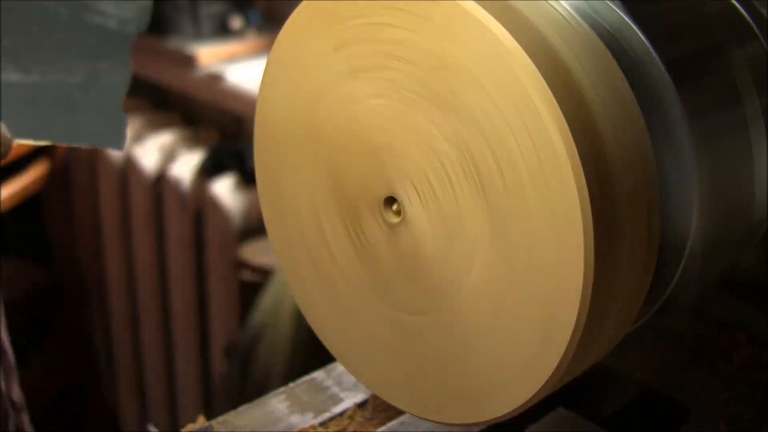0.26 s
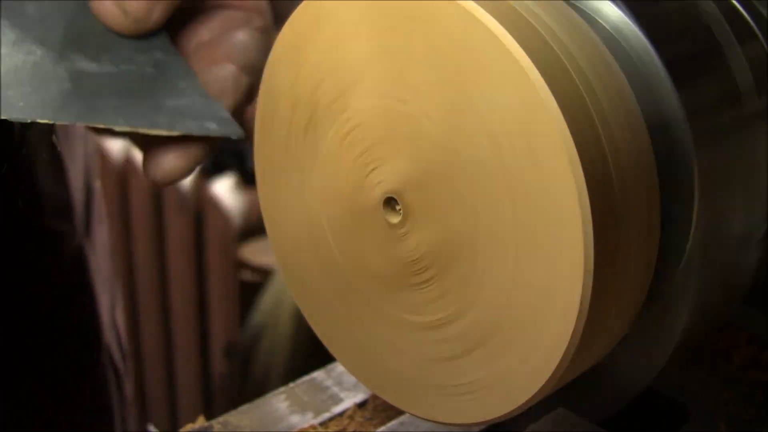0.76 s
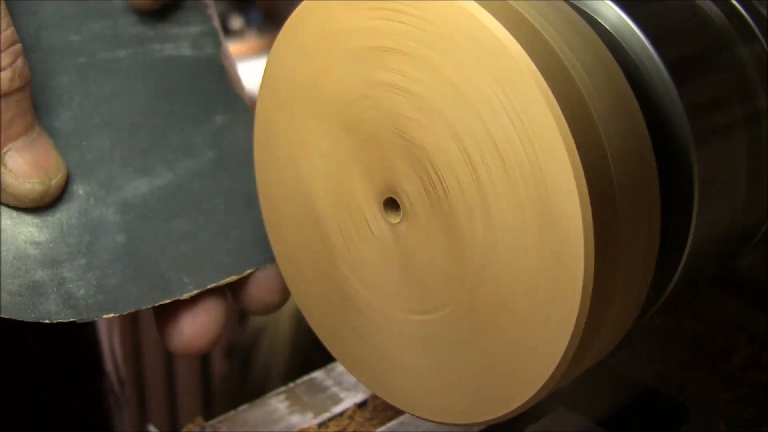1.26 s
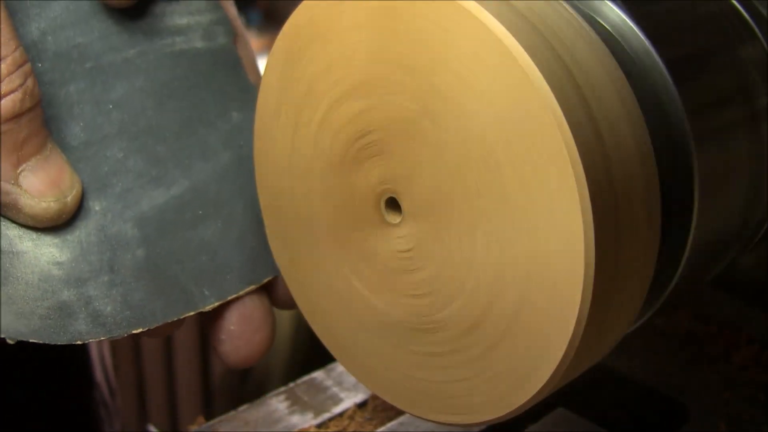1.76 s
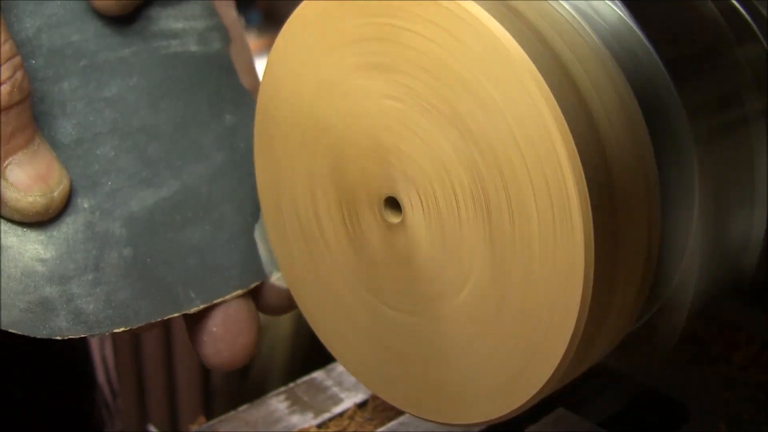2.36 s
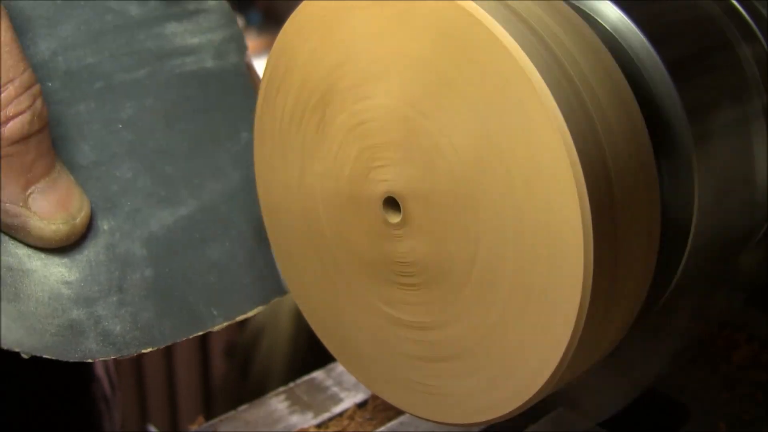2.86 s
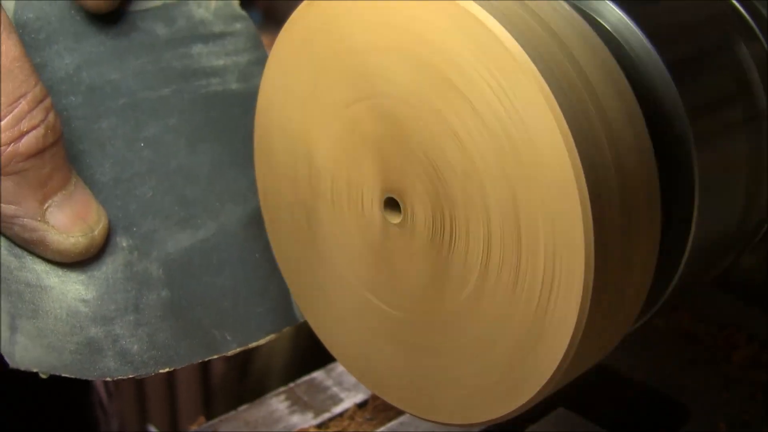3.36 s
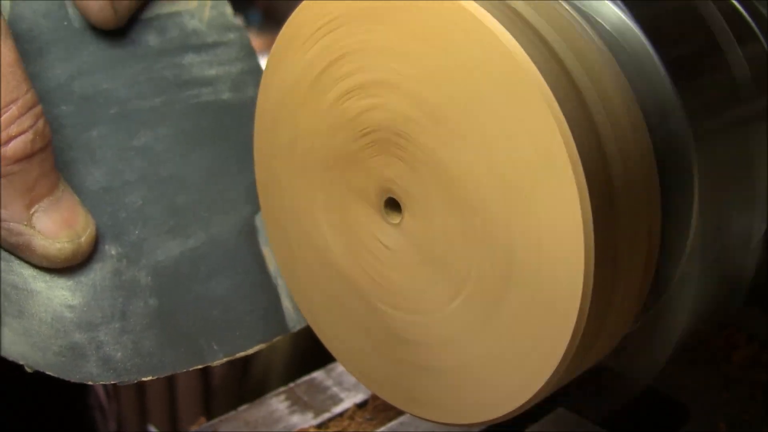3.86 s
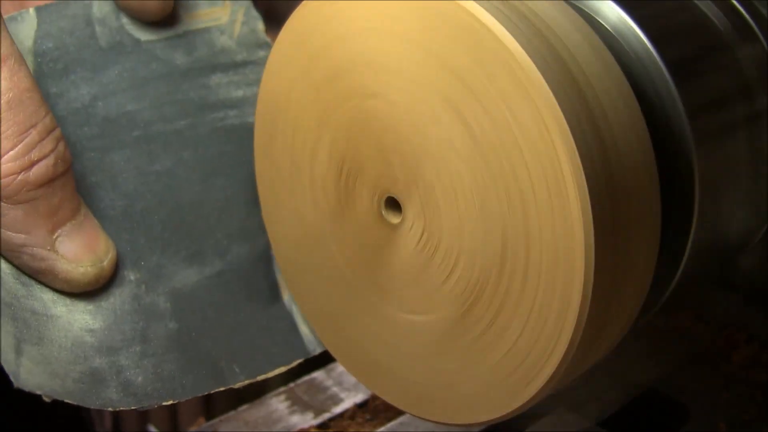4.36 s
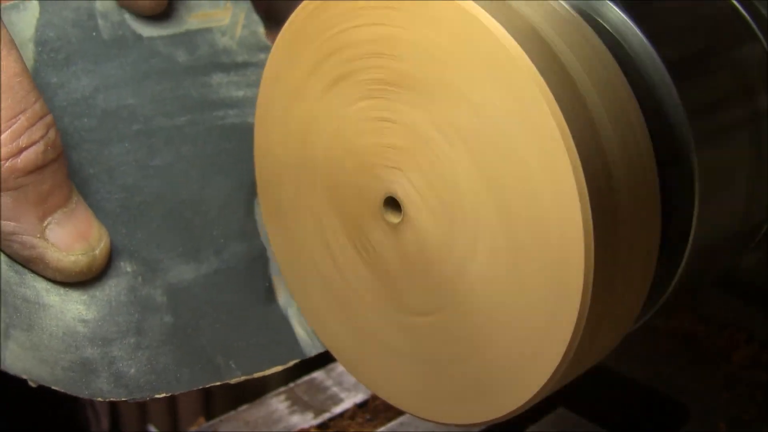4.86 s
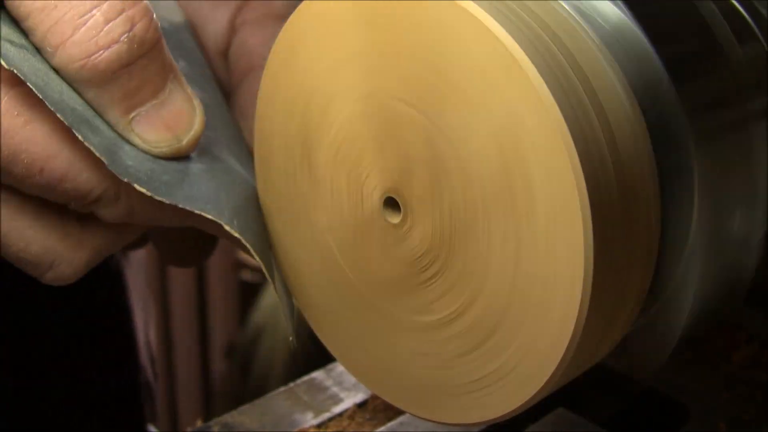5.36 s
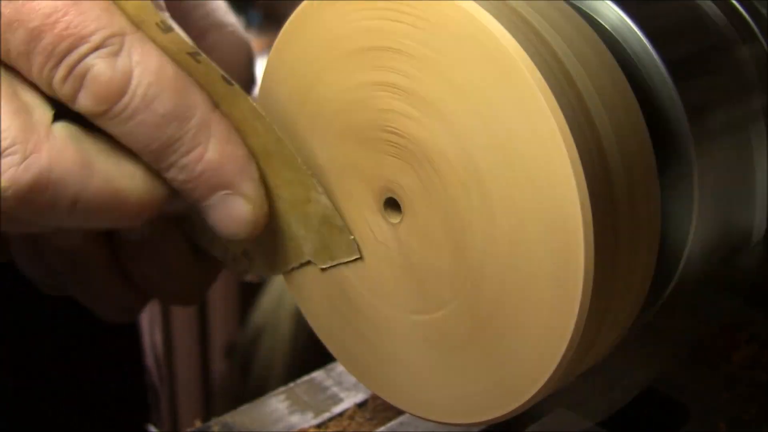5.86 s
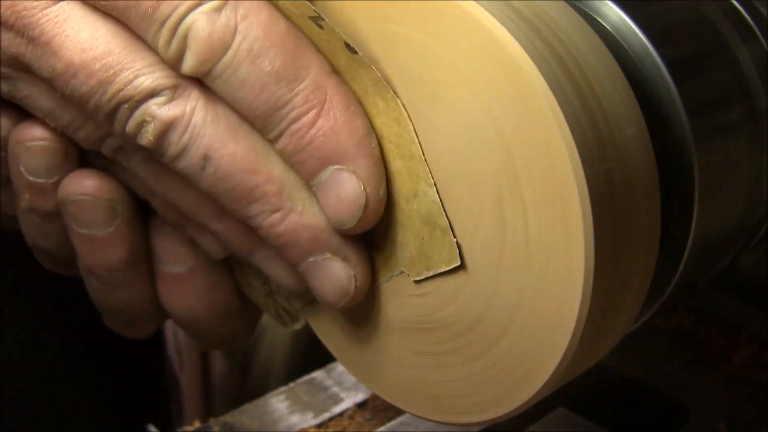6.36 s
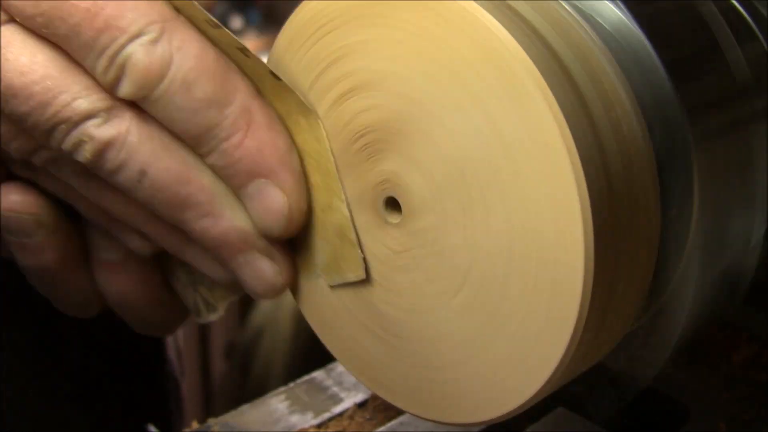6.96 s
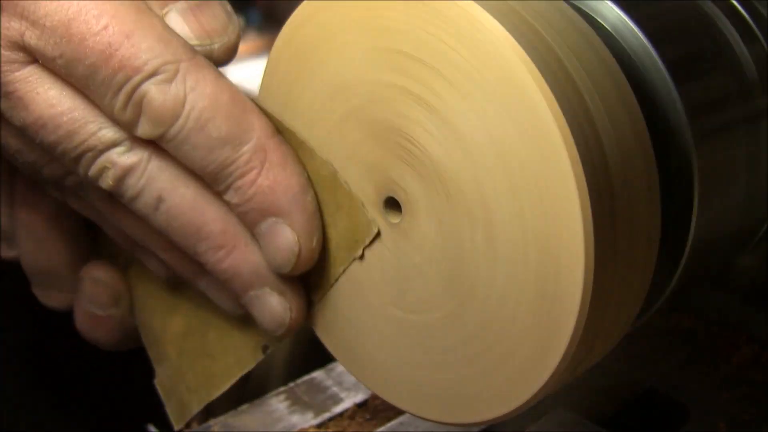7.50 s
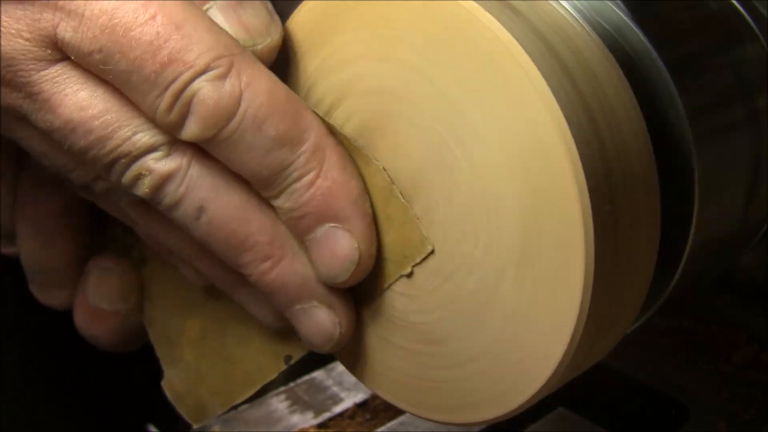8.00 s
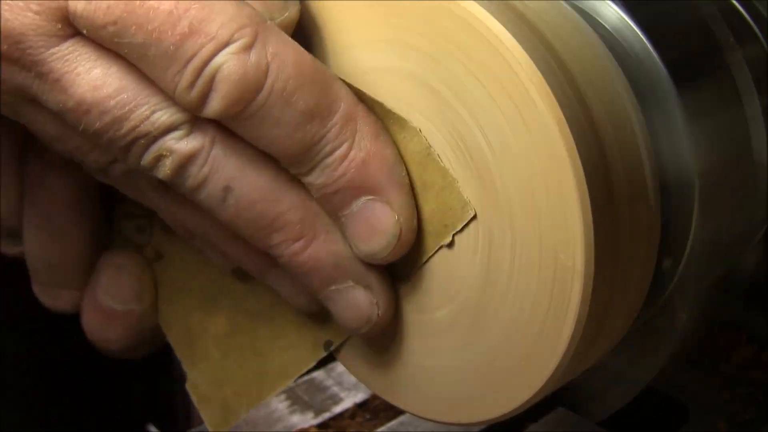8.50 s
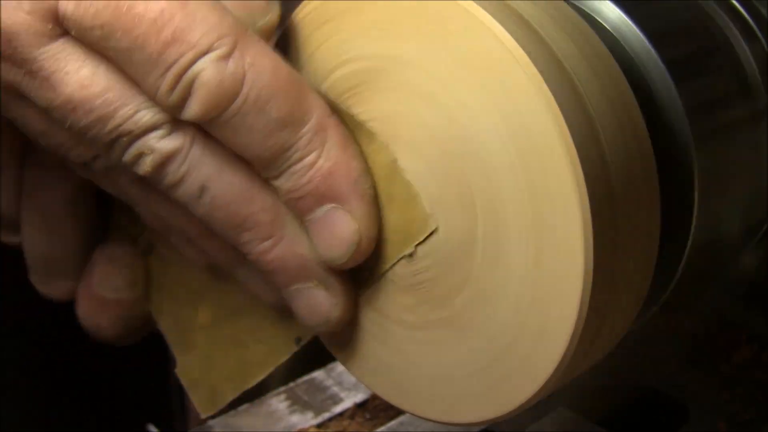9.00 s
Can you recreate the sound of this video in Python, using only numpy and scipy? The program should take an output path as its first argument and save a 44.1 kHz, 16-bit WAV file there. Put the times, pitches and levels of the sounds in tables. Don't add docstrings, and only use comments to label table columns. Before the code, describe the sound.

Steady electric motor whine around one kilohertz with bearing rattle, and bursts of bright sandpaper hiss, dry ticking snaps and thin squeaks on turning wood.

```python
import sys
import numpy as np
from scipy import signal
from scipy.fft import rfft, irfft, next_fast_len
from scipy.io import wavfile
from scipy.ndimage import uniform_filter1d

SR = 44100
rng = np.random.default_rng(int(sys.argv[2]) if len(sys.argv) > 2 else 0)


def gain_from_db(level_db):
    decades = np.asarray(level_db, float) / 20
    return 10 ** decades


def transcribe(signal):
    frames = np.atleast_2d(signal).T
    limited = np.clip(frames, -1, 1)
    pcm = np.round(limited * 32767).astype(np.int16)
    wavfile.write(sys.argv[1], SR, pcm)


N = 407484
T = np.arange(N) / SR
SLOTS = 44
SPINDLE_HZ = 30.4


def evened(x):
    return x / np.sqrt(np.mean(x ** 2) + 1e-20)


def read(points, hz):
    f, value = np.transpose(points)
    return np.interp(np.log(hz + 1), np.log(f + 1), value)


def coloured(x, points, modes=()):
    hz = abs(np.fft.fftfreq(16384, 1 / SR))
    db = read(points, hz)
    for mode_hz, width_hz, lift_db in modes:
        db = db + lift_db / (1 + (2 * (hz - mode_hz) / width_hz) ** 2)
    log_gain = np.log(gain_from_db(np.maximum(db, -100)))
    minimum_phase = np.exp(np.conj(signal.hilbert(log_gain)))
    taps = np.fft.ifft(minimum_phase).real[:4096]
    return signal.oaconvolve(x, taps)[:len(x)]


def drift(hz):
    coarse_t = T[::64]
    b, a = signal.butter(2, 128 * hz / SR)
    slow = signal.lfilter(b, a, rng.standard_normal(len(coarse_t)))
    return evened(np.interp(T, coarse_t, slow))


def resonate(x, hz, width):
    turn = np.exp(2j * np.pi * np.cumsum(hz) / SR)
    r = np.exp(-np.pi * width / SR)
    return 2 * (turn * signal.lfilter([1 - r], [1, -r], x / turn)).real


def grit(per_s, spread_db):
    size_db = spread_db * np.minimum(rng.exponential(1, N), 3.5)
    size = gain_from_db(size_db) * rng.choice([-1., 1.], N)
    return evened(size * (rng.random(N) < per_s / SR))


def patchy(x, patchy_db, size=(8, 30)):
    z = signal.stft(x, nperseg=512)[2]
    patches = uniform_filter1d(rng.standard_normal(z.shape), size=size[0], axis=0)
    patches = uniform_filter1d(patches, size=size[1], axis=1)
    return signal.istft(z * gain_from_db(patchy_db * evened(patches)), nperseg=512)[1][:N]


def span(rows):
    s, *columns = np.transpose(rows)
    touch_s = 0.0086
    gate = np.clip(np.minimum(T - s[0], s[-1] - T) / touch_s, 0, 1)
    return gate, [np.interp(T, s, c) for c in columns]


SLOT_SIDES_DB = [-15, -12.7, -1.3, -7.5, -24.5]
# multiple of rotor speed [ratio], then its level in [dB].
POLE_ORDERS = [32, 36.99, 37.93, 38.95, 40, 42, 46, 48, 50.05, 54.05, 56.03, 58.04, 62.1]
POLE_DB = [-38, -26, -27.5, -26.5, -16.5, -31, -26, -9.5, -25, -20, -49, -24.5, -33.5]
# multiple of rotor speed [ratio], then its level in [dB].
BEAT_ORDERS = [12.045, 14.47, 17.52, 22.2, 23.18, 26.74, 29.04, 30.8, 34.8, 41.09, 42.85, 45.14, 46.83,
               47.14, 49.13, 50.89, 51.33, 53.13, 55.11, 57.18]
BEAT_DB = [-35, -49, -42.5, -27, -35.5, -31, -46, -32.5, -52, -21.5, -30, -27, -15, -28, -10, -23.5, -47,
           -17.5, -73, -24.5]
# frequency in [Hz], level in [dB].
HUM = [(200.11, -38.5), (400.2, -43)]
# frequency in [Hz], density in [dB per Hz].
DRONE = [(30, -42), (130, -45), (220, -32), (330, -28), (480, -24.5), (610, -23), (820, -18.5),
         (1050, -12.5), (1120, 1.5), (1270, 0.5), (1390, -10), (1600, -18), (1850, -21), (2300, -24.5),
         (2800, -51.5)]
# frequency in [Hz], width in [Hz], lift in [dB].
CASING = [(295, 30, 8), (360, 20, 6), (550, 35, 14), (690, 40, 11), (890, 50, 7), (995, 30, 9),
          (1697, 22, 12), (1770, 25, 5), (1985, 40, 6), (2118, 50, 7), (2262, 40, 6)]
TWINS = {3: (.3, -.6), 40: (.7, 1.7), 48: (.22, 2.1), 49.13: (.25, 2.2), 57.18: (.9, 0), 45.14: (.3, 2.1)}
# moment when the slip beat cancels, in [s].
NULLS_S = [-.45, .3, 1.1, 1.75, 2.33, 2.95, 3.49, 4.06, 4.68, 5.33, 5.97, 6.6, 7.27, 7.87, 8.5, 9.16, 9.8]
# time in [s], share covered [0-1].
SHADE = [(0, .6), (.33, 1), (.55, .6), (.8, 0)]
SHADED = {3: (-6, 0), 40: (-5, -6), 48: (-3, -3), 49.13: (-6, -6), 53.13: (6, 0), 2: (-1.5, 0)}


def whine(rotor):
    swing = 2 * np.pi * 200.1 * T
    slip = 2 * np.pi * (np.interp(T, NULLS_S, np.arange(len(NULLS_S))) + .5)
    shade = np.interp(T, *np.transpose(SHADE))

    def tone(name, db, angle, wobble_db):
        twin, lag = TWINS.get(name, (0, 0))
        line_db, twin_db = SHADED.get(name, (0, 0))
        line = np.cos(angle) * (gain_from_db(line_db * shade) if line_db else 1)
        if twin:
            line = line + twin * gain_from_db(twin_db * shade) * np.cos(angle - slip + lag)
        return gain_from_db(db + 3.5 + wobble_db * drift(7.9)) * line

    def band(lo_hz, hi_hz):
        sos = signal.butter(3, [lo_hz, hi_hz], "bandpass", fs=SR, output="sos")
        return signal.sosfiltfilt(sos, out)

    out = np.zeros(N)
    for k, db in enumerate(SLOT_SIDES_DB):
        side_lag = .8 * (k != 2)
        out += tone(k, db, SLOTS * rotor + (k - 2) * swing - side_lag, .4)
    for order, db in zip(POLE_ORDERS, POLE_DB):
        out += tone(order, db, order * rotor, .9)
    for order, db in zip(BEAT_ORDERS, BEAT_DB):
        out += tone(order, db, order * rotor + 2 * np.pi * rng.random(), 0.58)
    for hz, db in HUM:
        out += tone(hz, db, 2 * np.pi * hz * T, .2)
    out += gain_from_db(-7.0) * evened(coloured(rng.standard_normal(N), DRONE, CASING))
    mirrored = 1.2 * np.clip(1 - T / .33, 0, 1) * band(1337, 1510)
    screened = .15 * shade * band(900, 1290)
    return out + mirrored - screened


# frequency in [Hz], density in [dB per Hz].
RATTLE = [(300, -69), (1500, -31.5), (1900, -16.5), (2300, -8.5), (2700, -4.5), (3600, 0.5), (4250, -1),
          (4740, -8.5), (5300, -7.5), (5900, -12.5), (7000, -18.5), (9900, -20.5), (12500, -28.5),
          (16000, -35)]
# frequency in [Hz], width in [Hz], lift in [dB].
HEADSTOCK = [(2190, 25, 4), (2390, 35, 7), (2537, 40, 8), (2590, 20, 4), (2800, 50, 4), (2965, 35, 8),
             (3045, 40, 6), (3107, 40, 9), (3160, 40, -4), (3250, 35, 7), (3405, 40, 5), (3530, 60, 5),
             (3760, 60, -4), (3833, 35, 6), (4200, 100, 2), (4390, 40, 3), (4650, 50, 6), (4880, 80, -4),
             (5095, 70, 8), (6220, 160, 9), (7400, 400, 3), (10100, 120, 7)]
# frequency in [Hz], density in [dB per Hz].
FINE = [(1000, -90), (9000, -46), (12000, -18), (13200, 6), (14300, 4), (15500, 7), (17000, -22)]


def bearings(spindle):
    balls = spindle * 141.35 / SPINDLE_HZ
    knocks = 1 + 0.087 * np.cos(balls / 2) + 0.13 * np.cos(balls) + 0.15 * np.cos(2 * balls + 0.36)
    throb_db = 0.4 * np.cos(spindle + .3) + 0.9 * np.cos(2 * spindle + .6)
    throb_db += 0.7 * drift(40) + 0.32 * drift(3.4)
    drive = (rng.standard_normal(N) + 0.59 * grit(2500, 2.2)) * knocks * gain_from_db(throb_db)
    loose_chips = gain_from_db(-41) * evened(coloured(grit(22, 3.5), FINE))
    air = rng.standard_normal(N) * gain_from_db(3.5 * drift(90))
    cooling_air = gain_from_db(-39) * evened(coloured(air, FINE))
    rattle = patchy(coloured(drive, RATTLE, HEADSTOCK), patchy_db=1.1, size=(2, 3))
    return gain_from_db(-6.0) * evened(rattle) + loose_chips + cooling_air


# time in [s], pressure as hiss in [dB],
# bend of the sheet [0 dull, 1 middle, 2 bright].
RIM_RUBS = [
    [(1.25, -43, 0.68), (1.3, -43, 0.6), (1.354, -36.5, 1.3), (1.436, -42.5, .6), (1.64, -36, 1.97),
     (2.05, -40.5, 2.1), (2.12, -43, 1.6), (2.2, -40, 2.3), (2.28, -44, 1.6), (2.37, -43, 1.8),
     (2.43, -49, 1.5), (2.54, -45, 1.9), (2.66, -54, 1.2), (2.78, -60, .6)],
    [(2.8, -53, .3), (2.886, -48.5, 1.9), (2.98, -39, 0.97), (3.1, -39.5, 1.16), (3.25, -41, 1.1),
     (3.52, -43, 1), (3.58, -40.5, 1.1), (3.68, -47, 1), (3.73, -43, 1.1), (3.8, -47.5, 1.1),
     (3.91, -41.5, .9), (3.99, -55, 0.64)],
    [(4.09, -47, .6), (4.116, -43, 1.3), (4.3, -46, 1.4), (4.37, -38.5, 1.5), (4.5, -43, 1.4),
     (4.6, -45.5, 1.5), (4.7, -43, 1.4), (4.77, -46, 1.5), (4.88, -42, 1.5), (4.95, -40.5, 1.3),
     (4.995, -53, 1.1)],
]
# time in [s], pressure as hiss in [dB], bend [0-2].
FACE_RUBS = [
    [(5.255, -42, .3), (5.31, -37, .9), (5.4, -41.5, 0.36), (5.75, -42, 0.18), (5.86, -34.5, 0.64),
     (5.93, -48, .6)],
    [(5.99, -46, 1.1), (6.044, -35.5, 1.5), (6.44, -33, 2.4), (6.6, -34.5, 1.6), (6.72, -33.5, 1.9),
     (6.76, -36.5, 1.6), (7.06, -35.5, 2), (7.09, -49, 1.1)],
    [(7.48, -60.5, .6), (7.52, -32, 1.6), (7.72, -41, 1.3), (7.95, -39.5, 1.4), (8.33, -40.5, 1.3),
     (8.62, -38.5, 1.6), (9.16, -38, 1.8), (9.25, -43, 1.2)],
]
CHATTER = [0.23, 0.16, 0.25, 0.29, 0.042, 0.028]
RINGS = [.5, .9, .1]
# frequency the loose sheet rings at on the rim, in [Hz], at bend 0, 1, 2.
RING_HZ = [8800, 10800, 14800]
# frequency in [Hz], density in [dB per Hz].
COARSE = [(300, -84), (1500, -38), (3000, -25), (5000, -3), (7000, -0.5), (8500, 1), (10000, -3),
          (11500, -29), (16000, -44)]
# frequency in [Hz], density in [dB per Hz].
MIDDLE = [(1000, -90), (6000, -19), (9000, -7), (10200, -4.5), (11500, -1), (12800, -4.5), (14000, -18),
          (16000, -40)]


def sanding(spindle):
    drive = rng.standard_normal((3, N)) + 0.61 * grit(5700, 2.3)
    grain_db = 0.82 * np.cos(2 * spindle + .4) + 0.34 * np.cos(6 * spindle + .4)
    drive *= gain_from_db(grain_db + 1.36 * drift(24) + 0.64 * drift(150))
    bump = evened(np.exp(1.7 * np.cos(3 * spindle + .7)) * gain_from_db(1.2 * drift(25)))
    gains, chatter, shape = np.zeros((3, N)), np.zeros(N), np.zeros(N)
    for rows, share in zip(RIM_RUBS + FACE_RUBS, CHATTER):
        gate, (db, bend) = span(rows)
        off_bend = np.arange(3)[:, None] - bend
        gains += gate * gain_from_db(db - 2 * off_bend ** 2)
        shape += (gate > 0) * bend
        chatter += gate * np.clip(share, 0, 1)
    drive *= 1 - chatter + chatter * bump
    hiss = np.zeros(N)
    for gain, x, grade in zip(gains, drive, (COARSE, MIDDLE, FINE)):
        hiss += gain * evened(coloured(x, grade))
    ringing = sum(ring * span(rows)[0] for ring, rows in zip(RINGS, RIM_RUBS))
    ring_hz = np.interp(shape, np.arange(3), RING_HZ)
    hiss = hiss + ringing * resonate(hiss, ring_hz, width=1700)
    return patchy(gain_from_db(-2.5) * hiss, patchy_db=2.1)


# start in [s], length in [s], pitch in [Hz], level in [dB], fall over its length in [dB].
WHISTLES = [
    (7.488, 2.5, 4180, -40, 20),
]
# start in [s], length in [s], first pitch in [Hz], last pitch in [Hz], level in [dB].
GRIPS = [(6.176, 0.22, 4080, 4330, -39.5), (6.388, .11, 4180, 4240, -38), (6.51, .15, 4170, 4270, -38),
         (6.672, .09, 4240, 4230, -37), (6.78, 0.13, 4110, 4320, -40), (6.903, 0.16, 4100, 4460, -43)]
# start in [s], length in [s], pitch in [Hz], level in [dB].
BITES = [(5.836, 0.066, 4230, -26.5), (6.055, 0.119, 4170, -32), (7.5, 0.075, 4080, -44.5),
         (7.85, 0.077, 4180, -41)]


def squeal():
    hz, low_gain, octave_gain = np.full(N, 4200.), np.zeros(N), np.zeros(N)
    whistle_low_db, bite_octave_db = -3.5, -10.5
    for start, length, pitch_hz, db, fall_db in WHISTLES:
        gate, (t,) = span([(start, 0), (start + length, length)])
        hz += (gate > 0) * (pitch_hz * (1 + .02 * np.exp(-t / .06)) - hz)
        gain = gate * gain_from_db(db - fall_db * np.sqrt(t / length))
        low_gain += gain_from_db(whistle_low_db) * gain
        octave_gain += gain
    for start, length, first_hz, last_hz, db in GRIPS:
        gate, (t,) = span([(start, 0), (start + length, 1)])
        hz += (gate > 0) * (first_hz + (last_hz - first_hz) * t - hz)
        gain = gate * gain_from_db(db - 3.0 - 5 * (0.5 - np.sin(np.pi * t)))
        low_gain += gain_from_db(whistle_low_db) * gain
        octave_gain += gain
    for start, length, pitch_hz, db in BITES:
        gate, (t,) = span([(start, 0), (start + length, 1)])
        hz += (gate > 0) * (pitch_hz * (1.004 - .012 * t ** 2) - hz)
        gain = gate * gain_from_db(db - 6.3 * t)
        low_gain += gain
        octave_gain += gain_from_db(bite_octave_db) * gain
    hz = uniform_filter1d(hz, size=600) * (1 + .008 * drift(40))
    noise = rng.standard_normal((2, N)) * gain_from_db(2.5 * drift(35))
    low = resonate(resonate(noise[0], hz, 150), hz, 150)
    low = low / uniform_filter1d(abs(low), size=900)
    octave = resonate(resonate(noise[1], 2.03 * hz, 360), 2.03 * hz, 360)
    return low_gain * evened(low) + octave_gain * evened(octave)


# time
# in [s], dull part in [dB], middle part in [dB], bright part in [dB].
SNAPS = [(0.4234, -21, -29, -35), (0.4663, -37, -31, -57), (0.6248, -23, -31, -55), (1.2573, -38, -35, -36),
         (1.299, -34, -32, -19), (1.3076, -39, -46, -23), (1.3788, -34, -29, -43), (1.3971, -30, -28, -31),
         (1.4512, -22, -29, -27), (1.4626, -28, -37, -29), (1.7149, -41, -27, -27), (1.7367, -24, -26, -40),
         (2.6463, -40, -30, -43), (2.8672, -28, -41, -29), (3.5896, -26, -31, -32), (3.6005, -22, -28, -29),
         (3.6111, -28, -29, -26), (3.6222, -28, -28, -25), (4.1642, -32, -36, -27), (4.1802, -35, -25, -26),
         (4.1912, -43, -25, -18), (4.2351, -31, -28, -23), (4.2461, -33, -28, -21), (4.2899, -30, -24, -25),
         (4.3007, -26, -22, -20), (4.312, -27, -24, -24), (4.3414, -37, -38, -29), (4.5091, -28, -26, -22),
         (4.5212, -26, -35, -29), (4.531, -30, -30, -24), (4.5417, -23, -25, -19), (4.5527, -26, -28, -27),
         (4.564, -37, -32, -36), (4.7152, -44, -49, -27), (4.7231, -32, -36, -25), (4.7344, -22, -23, -34),
         (4.745, -23, -26, -33), (5.3183, -37, -46, -22), (5.5275, -32, -27, -30), (5.5384, -29, -27, -31),
         (5.5492, -26, -34, -35), (5.5604, -25, -31, -34), (5.5714, -30, -26, -32), (5.591, -21, -31, -29),
         (5.9492, -36, -43, -58), (5.979, -41, -33, -57), (7.0586, -31, -39, -26), (7.1705, -40, -35, -40)]


def snaps():
    t, out = np.arange(1500) / SR, np.zeros(N + 1500)
    edges_hz = [2400, 5000], [5000, 9000], [9000, 16500]
    bands = [signal.butter(2, edges, "bandpass", fs=SR, output="sos") for edges in edges_hz]
    decay_s = np.array([[.0012], [.0014], [.001]])
    thud = gain_from_db(-50) * np.sin(2 * np.pi * 110 * t) * np.exp(-t / .003)
    for s, *dbs in SNAPS:
        tick = 3.1 * (t == 0)
        burst = rng.standard_normal((3, 1500)) * np.exp(-t / decay_s) + tick
        snap = gain_from_db(1.5 * (max(dbs[1:]) + 15.0)) * thud
        for db, band, x in zip(dbs, bands, burst):
            part = signal.sosfilt(band, x)
            snap = snap + gain_from_db(db + 4.0) * part / abs(part).max()
        out[round(s * SR):][:1500] += snap
    return out[:N]


# frequency in [Hz], time to fall 60 dB in [s].
SHOP = [(150, 0.55), (1000, 1), (4000, 0.2), (12000, 0.018)]
# frequency in [Hz], level in [dB].
SHOP_COLOUR = [(60, -30), (200, -12.5), (400, -19), (700, -8.5), (1300, -20), (3000, -15), (7000, -20),
               (10000, -16.5), (14000, -10.5)]


def shop(x):
    taps = np.zeros(SR // 2)
    at = np.arange(100, SR // 2 - 20, 20)
    taps[at + rng.integers(0, 20, len(at))] = rng.choice([-1., 1.], len(at))
    hz, t, z = signal.stft(taps, SR, nperseg=256)
    z = z * gain_from_db(-60 * t / read(SHOP, hz)[:, None])
    z = z / np.linalg.norm(z, axis=1)[:, None]
    tail = signal.istft(z, SR, nperseg=256)[1]
    wet = signal.fftconvolve(x, tail / np.linalg.norm(tail))[:N]
    return coloured(wet, SHOP_COLOUR) * [[1], [-1]]


# frequency in [Hz], left minus right in [dB].
LEAN = [(60, .6), (200, 3.6), (380, 1.2), (700, 1.1), (1290, 1.4), (2380, 1.7), (4400, .9), (8120, 1),
        (15000, -1)]


def leaned(x, share):
    size = next_fast_len(N + 8192)
    lean_db = share * read(LEAN, np.fft.rfftfreq(size, 1 / SR))
    return irfft(rfft(x, size) * gain_from_db([lean_db / 2, -lean_db / 2]), size)[:, :N]


# time in [s], fall time in [s], brief dip in [dB], lasting dip in [dB].
DUCKS = [(1.39, 0.18, 4.5, -0.5), (1.46, 0.027, 0.5, 5.5), (2.6, 0.36, 0.5, 1.5), (3.4, 0.62, 0, 2),
         (3.63, 0.047, 3, 1), (4.19, 0.012, 3, 5), (4.32, 0.041, 3.5, 1.5), (4.55, 0.08, 3.5, 2),
         (4.71, 0.06, 0.5, 0.5), (5.9, 0.64, 1.5, 2.5), (6.12, 0.09, -0.5, 5), (6.74, 0.2, -0.5, 2),
         (7.05, 0.52, 2.5, 0), (7.67, 0.23, 0.5, 6.5), (9.1, 0.91, 0, 3.5)]


def ridden():
    out = np.full(N, -26.)
    brief_s, lasting_s = 0.061, 0.6
    for s, fall_s, brief_db, lasting_db in DUCKS:
        ramp = np.clip(1 + (T - s) / max(fall_s, .005), 0, 1)
        after = np.maximum(T - s, 0)
        brief = brief_db * np.exp(-after / brief_s)
        lasting = lasting_db * np.exp(-(after / lasting_s) ** 1.58)
        out -= ramp * (brief + lasting)
    return out


# time in [s], rotor slot tone in [Hz].
SPEED = [(0, 1094.3), (1.2, 1094.5), (1.65, 1092.7), (2.3, 1091.6), (2.85, 1094.1), (3.35, 1091.3),
         (3.7, 1091.7), (4.12, 1094.1), (4.5, 1092.4), (4.9, 1092.3), (5.15, 1094.0), (5.62, 1092.9),
         (5.95, 1093.7), (6.4, 1092.5), (6.95, 1092.3), (7.4, 1094.5), (7.65, 1092.4), (9.24, 1092.9)]


def scene():
    slot_hz = uniform_filter1d(np.interp(T, *np.transpose(SPEED)), size=4000)
    rotor = 2 * np.pi * np.cumsum(slot_hz) / SR / SLOTS
    spindle = rotor * SLOTS * SPINDLE_HZ / slot_hz.mean()
    machine = gain_from_db(ridden()) * (whine(rotor) + bearings(spindle))
    paper = sanding(spindle) + squeal() + snaps()
    return leaned(machine, 1) + leaned(paper, .2) + shop(machine + 0.84 * paper)


def low_pass(x):
    return signal.sosfilt(signal.butter(12, 16710, fs=SR, output="sos"), x)


def record(dry):
    lumpy = rng.standard_normal(N) * gain_from_db(5.5 * drift(4))
    rumble = coloured(lumpy, [(20, 0.0), (140, -7), (200, -28), (400, -77)])
    wired = (dry + gain_from_db(-95) * evened(rumble)) * signal.windows.tukey(N, 256 / N)
    limited = wired / (1 + (wired / .28) ** 6) ** (1 / 6)
    band_limit = signal.firwin(3001, 15785, window=("kaiser", 9), fs=SR)
    mix = signal.oaconvolve(limited, band_limit[None], "same", axes=1)
    return low_pass(mix)


dry = scene()
out = record(dry)
transcribe(out)
```